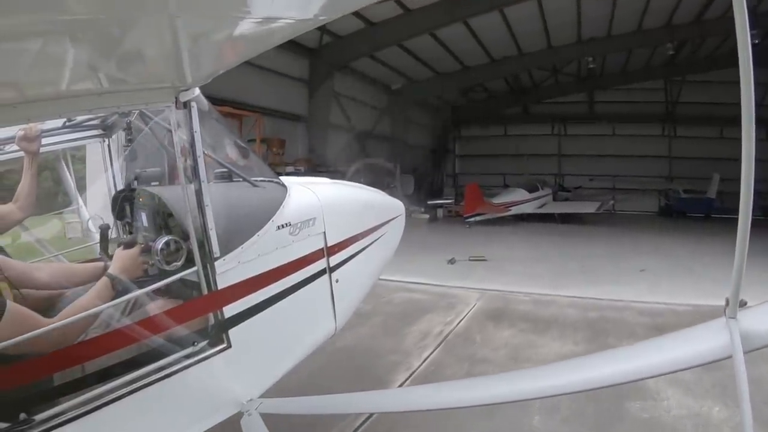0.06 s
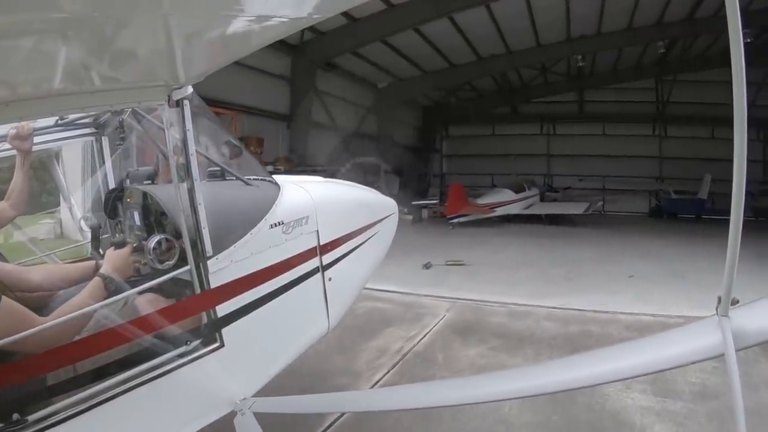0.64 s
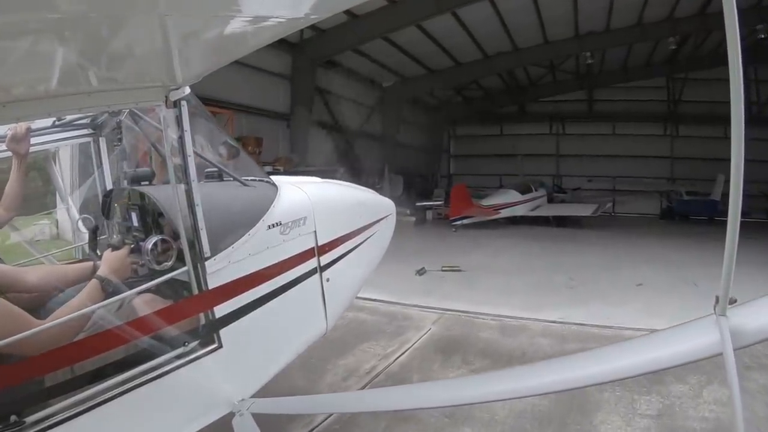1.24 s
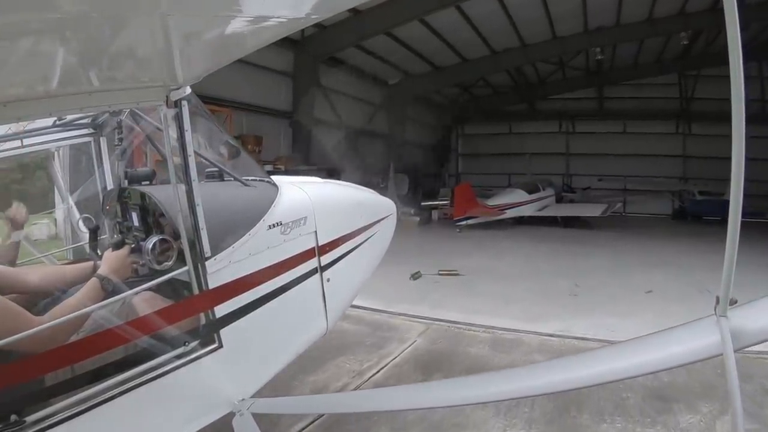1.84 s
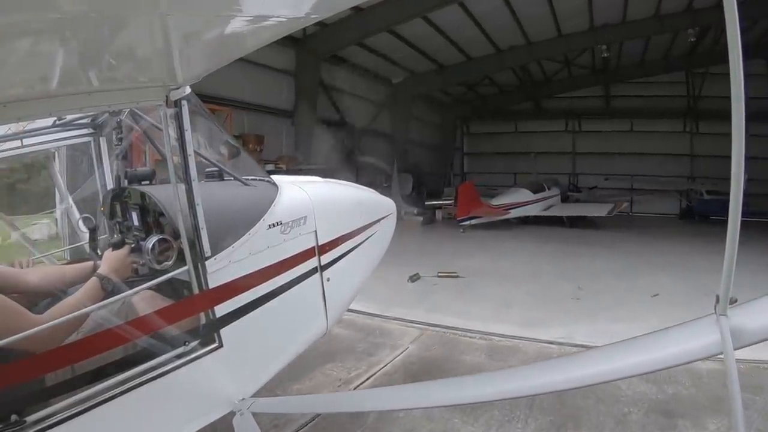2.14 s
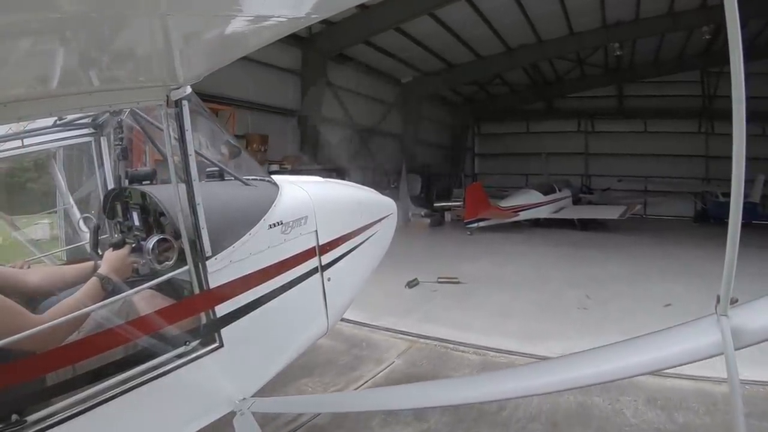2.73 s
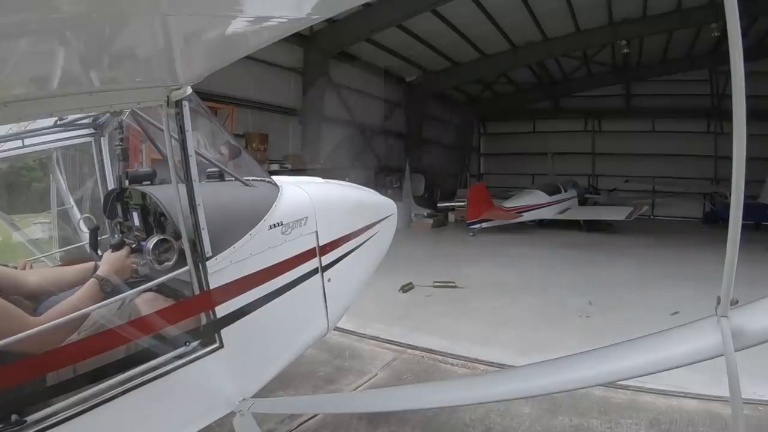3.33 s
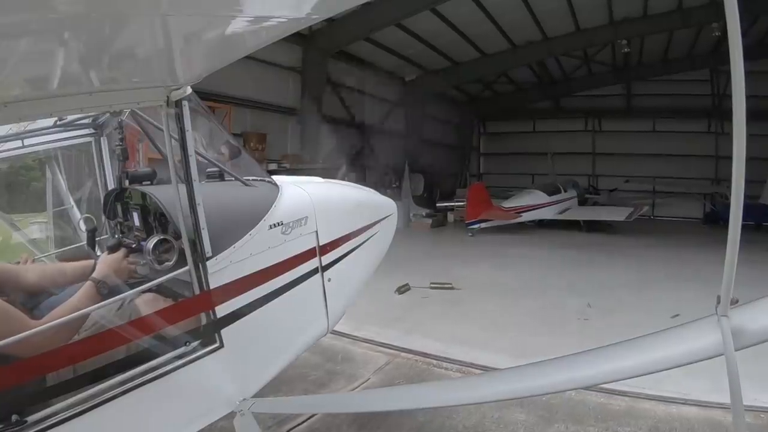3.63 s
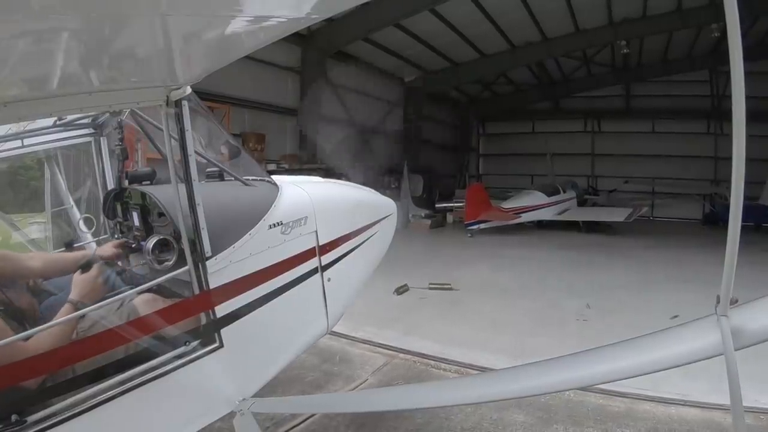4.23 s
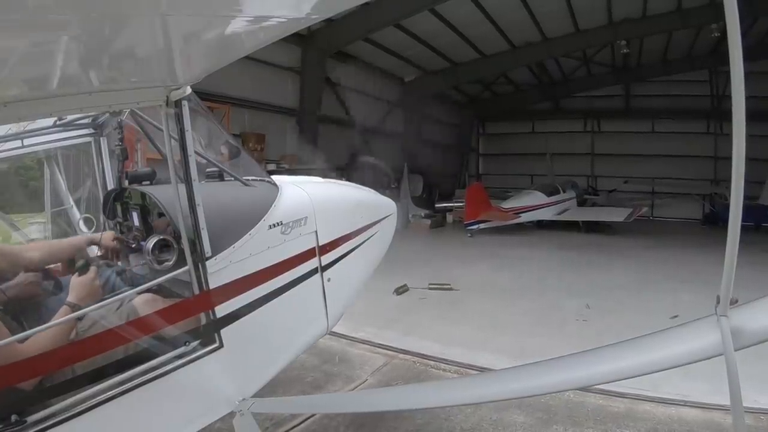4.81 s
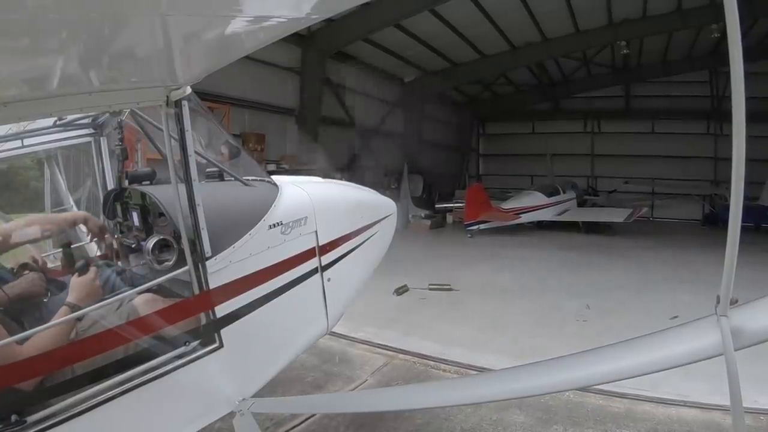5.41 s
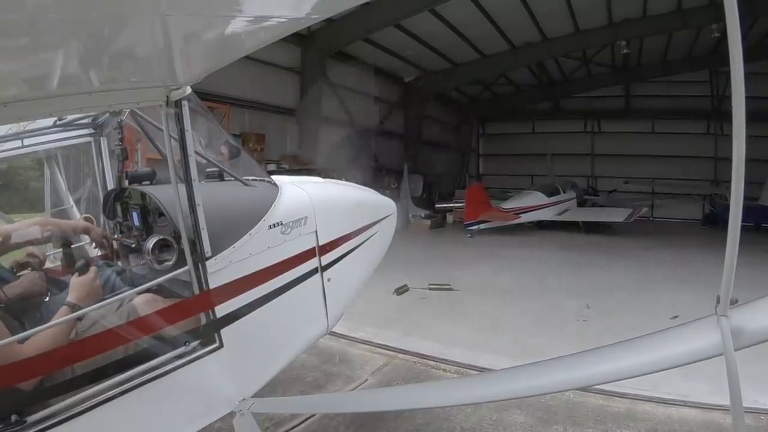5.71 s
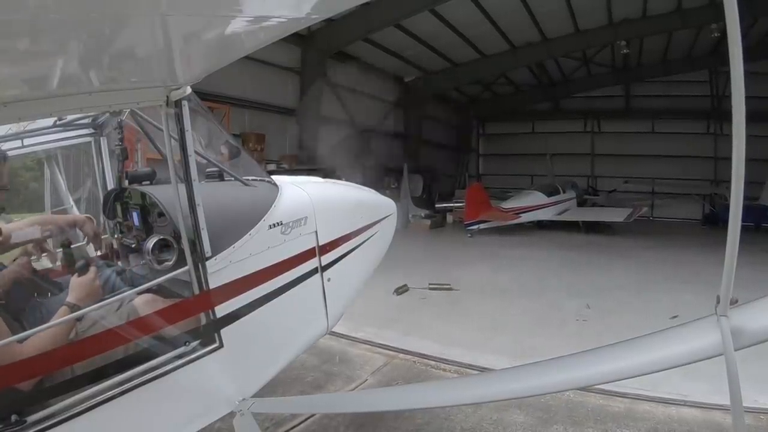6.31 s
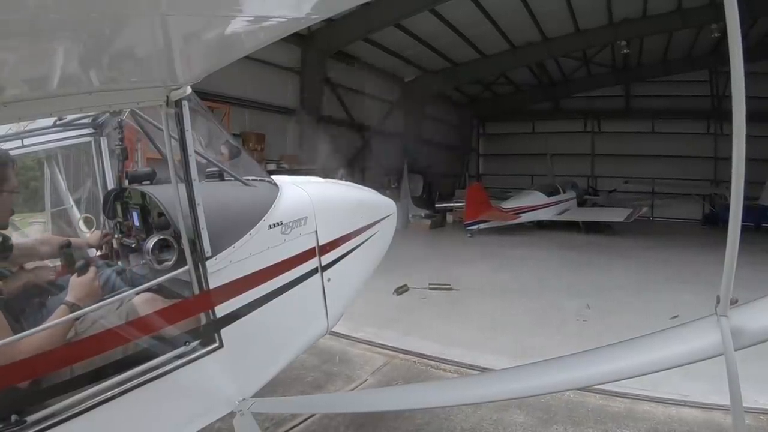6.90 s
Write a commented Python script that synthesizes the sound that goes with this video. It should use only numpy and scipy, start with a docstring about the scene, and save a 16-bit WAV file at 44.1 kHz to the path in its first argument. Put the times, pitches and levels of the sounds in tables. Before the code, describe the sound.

A light aircraft's piston engine runs loudly throughout, heard outdoors in front of a hangar, close beside the engine cover. It starts as a deep, fast-pulsing drone with a barking exhaust, a humming propeller that chops the air, a mechanical hiss and a low buffeting rumble. Irregular exhaust pops dot the first two and a half seconds, and the pitch eases slightly at around 1 second. From about 3 seconds the throttle closes and the engine slows, falling in pitch until just after 4 seconds. At about 3.8 seconds a brake gives one very short, low groan. The engine then settles into a lumpy, chugging idle with light metallic valve ticks. Between about 4.3 and 5 seconds it runs raggedly, with a harder bark and a dense cluster of pops. Another brief rough spell comes near 5.8 seconds, and the idle continues with scattered pops to the end, just after 7 seconds.

```python
"""Outside a hangar, beside the engine cover of a light aircraft that taxis up and stops.
Its four-cylinder engine fires in quick pulses, so the exhaust booms, barks and now and then pops.
The propeller hums and chops the air, and the valves and gears hiss. The throttle closes, a brake
groans as the wheels stop, and the engine drops to a lumpy, ticking idle."""
import sys
import numpy as np
from scipy import signal
from scipy.fft import rfft, irfft
from scipy.io import wavfile
from scipy.ndimage import uniform_filter1d, minimum_filter1d

SR = 44100
rng = np.random.default_rng(int(sys.argv[2]) if len(sys.argv) > 2 else 0)


def unload_wav(signal):
    """Save mono or channel-first audio to the path in sys.argv[1] as 16-bit WAV at rate SR, clipped to [-1, 1]."""
    wavfile.write(
        sys.argv[1],
        SR,
        np.round(np.clip(np.atleast_2d(signal).T, -1, 1) * 32767).astype(np.int16),
    )


N = 315310
TIME = np.arange(N) / SR
BINS = np.fft.rfftfreq(N, 1 / SR)
# In one engine cycle each cylinder fires once. Below, "cycles" is the running count of them.
IDLE_HZ, TAXI_HZ, FAST_HZ = 14.8, 19.3, 20.82  # cycles per second
BLADES_PER_CYCLE = 2.47

# Sound arrives out of step on the two sides. Each row: pitch in Hz, lead of the left in radians.
LEFT_LEAD = [(40, -4.1), (50, -3.9), (62, -2.5), (68, -.3), (77, .1), (93, -.6), (108, .3), (125, .1),
             (140, 1.7), (155, 2.4), (200, 1.3), (290, .6), (600, 1.9), (860, 2.7), (1500, 2.2), (2000, .8),
             (2600, 0), (4300, .3), (7000, 1), (15000, 2)]
# The four unequal cylinders. Each row: strength in dB, lateness at idle as a share of a cycle.
CYLINDERS = [(1, .005), (-1.5, .025), (-1, -.11), (0, .01)]
# The hardest exhaust pops. Each row: time in seconds, strength in dB.
HARD_POPS = [(0.426, -18.5), (0.459, -17), (0.504, -16), (0.59, -13.5), (0.648, -16.5), (0.7, -17),
             (0.796, -16.5), (0.836, -17.5), (1.002, -19), (1.123, -13.5), (1.533, -16), (1.558, -15),
             (1.584, -15.5), (1.626, -13), (1.74, -12.5), (2.124, -20), (2.191, -15), (2.377, -14),
             (2.634, -14), (3.397, -18), (3.632, -20), (3.802, -20), (3.965, -16.5), (4.037, -19),
             (4.11, -15.5), (4.306, -20.5), (4.345, -15.5), (4.372, -16), (4.409, -10.5), (4.436, -19),
             (4.452, -21.5), (4.476, -23.5), (4.541, -18), (4.563, -12), (4.603, -14.5), (4.645, -15.5),
             (4.659, -22), (4.672, -12.5), (4.718, -18.5), (4.737, -14), (4.796, -15.5), (4.821, -20.5),
             (4.864, -13.5), (4.909, -16.5), (4.928, -16), (4.954, -17.5), (4.972, -18.5), (4.994, -18.5),
             (5.25, -18.5), (5.318, -22), (5.493, -16.5), (5.75, -14.5), (5.765, -19), (5.829, -12.5),
             (5.895, -18), (6.02, -21.5), (6.251, -18.5), (6.297, -19), (6.407, -24), (6.469, -17),
             (6.536, -14), (6.553, -24), (6.668, -19.5), (6.736, -18), (7.049, -16.5), (7.114, -12.5)]


def undb(db):
    """Turn decibels into a gain."""
    return 10 ** (np.asarray(db) / 20)


def curves(table, x=TIME):
    """Follow each column of a table smoothly, by time or by another control."""
    points, *columns = np.transpose(table)
    return [np.interp(x, points, c) for c in columns]


def at(points, hz):
    """Read a table of pitches and values at any pitch."""
    pitch, value = np.transpose(points)
    return np.interp(np.log(hz + 1e-3), np.log(pitch), value)


def unit(x):
    """Scale a signal to an average (rms) level of 1."""
    return x / np.sqrt(np.mean(x ** 2))


def ring(x, colour):
    """Give a sound a tone colour, so that a pulse rings after it strikes, never before."""
    beyond = np.maximum(BINS / colour[-1][0], 1)  # fades steeply above the last row
    cepstrum = irfft(np.log(undb(at(colour, BINS)) / beyond ** 2), N)
    cepstrum[1:N // 2] *= 2
    cepstrum[N // 2 + 1:] = 0
    return irfft(rfft(x) * np.exp(rfft(cepstrum)), N)


def mode(pulses, hz, fade_s):
    """Strike one ringing note that falls by 60 dB in fade_s."""
    t = TIME[:SR // 5]
    return signal.oaconvolve(pulses, undb(-60 * t / fade_s) * np.sin(2 * np.pi * hz * t))[:N]


def shelf(x, hz, db):
    """Raise or lower everything above hz by a moving gain."""
    high = irfft(rfft(x) * (1 - 1 / (1 + (BINS / hz) ** 16)), N)
    return x + high * (undb(db) - 1)


def side_phases(hz):
    """Split the left side's lead evenly between left and right."""
    return at(LEFT_LEAD, hz) * np.array([[.5], [-.5]])


def spread(x):
    """Put the left and right sides of a sound out of step."""
    return irfft(rfft(x) * np.exp(1j * side_phases(BINS)), N)


def air(shared):
    """Left and right noise with a share of their power in common."""
    return np.sqrt(shared) * rng.standard_normal(N) + np.sqrt(1 - shared) * rng.standard_normal((2, N))


def wander(hz):
    """A smooth random drift of about 1 either way."""
    hold = int(SR / hz)
    steps = np.repeat(rng.standard_normal(N // hold + 1), hold)[:N]
    return unit(uniform_filter1d(uniform_filter1d(steps, hold), hold))


def strikes(times, sizes):
    """One sharp pulse at each of the times."""
    return np.bincount(np.clip(np.asarray(times) * SR, 0, N - 1).astype(int), sizes, N)


def sputter(pulses, burst_db, decay_s):
    """Follow each pulse with a short, ever new burst of noise, like swirling gas."""
    power = signal.lfilter([1], [1, -np.exp(-2 / (decay_s * SR))], pulses ** 2)
    return pulses + undb(burst_db) * np.std(pulses) * unit(np.sqrt(power) * air(shared=0.27))


def slipstream(db=-40, top_hz=35):
    """Air from the propeller buffets each side on its own with a deep rumble."""
    lowpass = signal.butter(2, top_hz, fs=SR, output="sos")
    return undb(db) * unit(signal.sosfilt(lowpass, air(shared=0)))


def gears(cycles, teeth_per_cycle=175, roughness_hz=135):
    """Meshing teeth whine roughly at their own rate and half of it, rattled by the propeller's load."""
    lowpass = signal.butter(2, roughness_hz, fs=SR, output="sos")

    def whine(multiple):
        rough = signal.sosfilt(lowpass, air(shared=1) + 1j * air(shared=1))
        return unit(np.real(rough * np.exp(2j * np.pi * multiple * cycles)))
    blades = 2 * np.pi * BLADES_PER_CYCLE * cycles
    rattle = np.exp(.3 * np.cos(blades) + .5 * np.cos(2 * blades)) * undb(2 * wander(60))
    return (whine(teeth_per_cycle) + whine(teeth_per_cycle / 2)) * rattle


def hiss(cycles, settled):
    """Valves and blade tips hiss in step with the shafts."""
    # The colour of the hiss. Each row: pitch in Hz, level in dB.
    colour = [(1500, -9.5), (3000, -6.5), (4000, 0.5), (4850, -4.5), (5800, 1), (7500, 4), (8800, -8),
              (10200, -10), (11200, -13.5), (15500, -19.5)]
    valves = 0.089 * np.cos(4 * np.pi * cycles)
    blades = 0.045 * np.cos(2 * np.pi * BLADES_PER_CYCLE * cycles)
    swell = np.exp(valves + blades) * undb(0.54 * wander(22))
    noise = unit(spread(ring(air(shared=.35) * swell, colour)))
    return shelf(noise, hz=11000, db=-9 * settled)


def valve_ticks(cycles, scatter_db=5.5, slack_s=.0012):
    """The valves tick in every cycle; each tick rings the metal covers with its own mix of notes."""
    # The ticks. Each row: place in the cycle from 0 to 1, level in dB.
    ticks = [(.32, -2), (.79, 0), (.91, -.5)]
    # The covers' notes. Each row: pitch in Hz, fade time in seconds, level in dB.
    cover_notes = [(2080, .018, -3), (2600, .022, 0), (3450, .024, 1), (3900, .016, -1)]
    place, tick_db = np.transpose(ticks)
    times = np.interp(np.arange(int(cycles[-1]))[:, None] + place, cycles, TIME)
    times = times + slack_s * rng.standard_normal(times.shape)
    out = 0
    for hz, fade_s, note_db in cover_notes:
        chance = np.clip(rng.standard_normal(times.shape), -2, 1.3)
        sizes = undb(tick_db + note_db + scatter_db * chance)
        rattle = sputter(strikes(times.ravel(), sizes.ravel()), burst_db=-5, decay_s=.005)
        out = out + np.array([mode(side, hz, fade_s) for side in rattle])
    return unit(spread(out))


def brake(start_s=3.797, length_s=0.14, hz=174, sag=0.069):
    """The brake sticks and slips in a short groan; the airframe rings at four times its pitch."""
    progress = np.clip((TIME - start_s) / length_s, 0, 1)
    phase = 2 * np.pi * np.cumsum(hz * (1 - sag * progress ** 2)) / SR
    tone = undb(-21.5) * np.sin(phase) + undb(-36) * np.sin(4 * phase)
    return tone * np.sin(np.pi * progress) * np.array([[.7], [1.2]])


def propeller_wash(cycles, idling, left_db=0.73):
    """Swirling air and exhaust gas, chopped by the blades under power, puffing with the firings at idle."""
    # The colour of the rushing air. Each row: pitch in Hz, level in dB.
    colour = [(400, -10.5), (790, -7), (880, -3), (935, 5), (1030, -2.5), (1150, -1.5), (1280, -7),
              (1560, -9), (1680, -8.5), (1820, -14), (2100, -14), (2850, -18), (3500, -16.5), (4800, -32),
              (9000, -44.5)]
    puffs = 0.27 * np.cos(8 * np.pi * cycles) + 0.059 * np.cos(2 * np.pi * cycles)
    chop = 0.11 * np.cos(2 * np.pi * BLADES_PER_CYCLE * cycles)
    swell = np.exp(idling * puffs + (1 - idling) * chop)
    rush = air(shared=0.64) * swell * undb(0.51 * wander(25))
    return unit(spread(ring(rush, colour))) * undb([[left_db], [-left_db]])


def propeller_hum(cycles, idling, flutter=0.38):
    """The geared propeller hums out of step with the firings; gusts shake its higher tones most."""
    # Each row: multiple of the blade rate, left and right dB when taxiing, left and right dB at idle.
    tones = [(1, -45, -21.5, -42, -42), (2, -40.5, -18, -25.5, -31.5), (3, -51.5, -23, -54.5, -25)]
    out = 0
    for multiple, *db in tones:
        multiple, db = round(multiple), np.array(db)[:, None]
        level = undb(db[:2] * (1 - idling) + db[2:] * idling)
        gusts = unit(np.abs(1 + flutter * multiple * wander(12)))
        phase = multiple * (2 * np.pi * BLADES_PER_CYCLE * cycles + flutter * wander(12))
        out = out + level * gusts * np.cos(phase)
    return spread(out)


def firing_times(cycles, idling):
    """When the cylinders fire, in seconds: evenly under power, limping at idle."""
    even = np.arange(.025, cycles[-1], 1 / 4)
    late = np.resize(np.transpose(CYLINDERS)[1], len(even)) * np.interp(even, cycles, idling)
    return np.interp(even + late, cycles, TIME)


def stutter(times, sizes, idling, jitter=.13, scatter_db=2, under_power_db=-7):
    """Gas leaves in uneven after-bursts behind each pulse: a rasp at idle, weaker under power."""
    # The after-bursts. Each row: usual gap before it in seconds, level against the pulse in dB.
    bursts = [(.0075, -8.5), (.0065, -13), (.007, -12)]
    gap_s, db = np.transpose(bursts)
    chance = rng.standard_normal((len(times), 2, len(gap_s)))
    later = times[:, None] + np.cumsum(gap_s * (1 + jitter * chance[:, 0]), axis=1)
    power = 1 - np.interp(times, TIME, idling)[:, None]
    weaker = sizes[:, None] * undb(db + under_power_db * power + scatter_db * chance[:, 1])
    return strikes(times, sizes) + strikes(later.ravel(), weaker.ravel())


def exhaust_thuds(fired, settled, idle_db=6):
    """No two firings burn alike: their differences make low thumps, louder at idle."""
    # The colour of a thud on each side. Each row: pitch in Hz, level in dB.
    left_colour = [(15, -30), (40, -39.5), (70, 10), (95, -3), (150, -1.5), (200, -25), (400, -54.5)]
    right_colour = [(15, -25.5), (42, -12), (70, 2.5), (100, -2.5), (145, 1), (175, -8), (210, -4),
                    (240, -23.5), (400, -46)]
    pulses = strikes(fired, rng.uniform(-1, 1, len(fired)))
    left, right = sputter(pulses, burst_db=-3, decay_s=.03)
    left = undb(-32) * unit(ring(left, left_colour))
    right = undb(-29) * unit(ring(right, right_colour))
    return spread(np.array([left, right])) * undb(idle_db * settled)


def ragged_running():
    """Extra bark in dB while the engine runs raggedly: each spell rises fast, holds and dies away."""
    # Each row: start in seconds, length in seconds, boost in dB.
    spells = [(0.304, 0.59, 1.5), (4.27, 0.77, 5), (5.744, 0.18, 4), (6.186, .13, 1)]
    extra_db = 0
    for start_s, length_s, db in spells:
        progress = np.clip((TIME - start_s) / length_s, 0, 1)
        extra_db += db * np.sqrt(np.abs(np.sin(np.pi * progress)))
    return extra_db


def exhaust_bark(fired, idling, scatter_db=2, jitter_s=.0004):
    """Each firing cracks out of the pipe and rings the silencer, with a brighter rasp at idle."""
    # The colour of the bark on each side. Each row: pitch in Hz, level in dB.
    left_colour = [(120, -7.5), (220, -7.5), (310, 1), (400, 0), (525, 5), (565, -3), (603, -8), (640, -7),
                   (678, 2), (760, -15.5), (935, -9.5), (1040, -13.5), (1150, -3), (1220, -19), (1290, -23),
                   (3000, -54)]
    right_colour = [(120, -26.5), (220, 3.5), (310, 10), (370, 2), (440, 8.5), (500, 3), (550, -7),
                    (600, -4.5), (690, -9), (780, -11.5), (935, -5), (1040, -14), (1160, -12),
                    (1290, -30.5), (3000, -48.5)]
    chance = rng.standard_normal((len(fired), 2))
    cylinder_db = np.resize(np.transpose(CYLINDERS)[0], len(fired))
    sizes = undb(cylinder_db + scatter_db * np.clip(chance[:, 0], -2, 1))
    # A weak firing leaves the unburnt fuel that feeds a pop.
    wait_s = np.transpose(HARD_POPS)[0] - fired[:, None]
    sizes[((wait_s > -.004) & (wait_s < .025)).any(axis=1)] *= .35
    pulses = stutter(fired + jitter_s * chance[:, 1], sizes, idling)
    left, right = sputter(pulses, burst_db=-7, decay_s=.007)
    bark = spread(np.array([ring(left, left_colour), ring(right, right_colour)]))
    return unit(shelf(bark, hz=550, db=5 * idling))


def exhaust_pops(fired, load_db, settled, stray_odds=0.025, idle_odds=0.45, stray_db=16.5):
    """Unburnt fuel goes off with a knock that rings the silencer: hard at set times, lightly by chance."""
    # The colour of the knock on each side. Each row: pitch in Hz, level in dB.
    left_colour = [(150, -28), (330, -10), (400, -5), (455, 1), (525, 3), (560, 1), (600, 0), (640, -5),
                   (680, -5), (760, -19), (930, -15), (1040, -21), (1160, -13), (1300, -28), (2500, -46)]
    right_colour = [(150, -28), (300, -7), (370, -3), (450, 3.5), (500, 1), (550, -4), (600, -5),
                    (680, -12), (790, -20), (930, -16), (2500, -46)]
    # The silencer's notes. Each row: pitch in Hz, fade time in seconds, left dB, right dB.
    silencer_notes = [(445, .06, -20, -17), (602, .06, -26, -28), (678, .1, -24, -32)]
    pop_s, pop_db = np.transpose(HARD_POPS)
    first_cylinder = np.resize([1, 0, 0, 0], len(fired))  # pops far more often at idle
    odds = stray_odds + idle_odds * first_cylinder * np.interp(fired, TIME, settled)
    clear = np.abs(pop_s - fired[:, None]).min(axis=1) > .02  # no hard pop close by
    strays = clear * (rng.random(len(fired)) < odds) * undb(stray_db + np.interp(fired, TIME, load_db))
    pulses = stutter(pop_s, undb(pop_db), settled) + stutter(fired, strays, settled)
    knock_peak = np.abs(ring(strikes([0], [1]), right_colour)).max()
    left, right = sputter(pulses / knock_peak, burst_db=-16, decay_s=.01)
    knock = np.array([ring(left, left_colour), ring(right, right_colour)])
    ringing = sum(undb(db)[:, None] * mode(pulses, hz, fade_s) for hz, fade_s, *db in silencer_notes)
    return spread(knock + ringing)


def standing_waves(hz):
    """How many dB a tone gains or loses on each side as its pitch slides through standing waves."""
    # Each row: pitch in Hz, half width in Hz, left dB, right dB.
    waves = [(65.8, 0.65, 10, 11.5), (67.7, 3.4, 1, 2.5), (74.57, 2.16, 8, 4), (98.3, 0.82, -1, -15),
             (128.9, 0.76, -11.5, 11), (138.9, 4.4, -16, 7.5), (151.8, 1.6, -5, -7.5)]
    grid_hz = np.arange(50, 200, .1)
    change_db = sum(np.array([[left_db], [right_db]]) * np.exp(-((grid_hz - centre) / width) ** 2)
                    for centre, width, left_db, right_db in waves)
    return np.array([np.interp(hz, grid_hz, side) for side in change_db])


def exhaust_boom(cycles, cycle_hz, settled):
    """The firings blend into a deep note and its octave; unequal cylinders add tones that chug at idle."""
    # Each row: cycle rate in Hz, left and right dB of the firing note, left and right dB of its octave.
    boom_levels = [(16.4, -26, -17.5, -21, -20), (19.5, -13.5, -15, -21.5, -15),
                   (20.46, -21.5, -11, -35, -26.5)]
    # The added tones at three speeds. Each row: multiple of the cycle rate, left dB, right dB.
    idle_tones = [(2, -30.5, -35), (3, -17.5, -25.5), (5, -37.5, -29.5), (6, -30.5, -11.5), (7, -36.5, -27),
                  (9, -24.5, -24), (10, -31.5, -23.5), (12, -53, -32.5), (13, -46, -35), (25, -44.5, -36.5)]
    taxi_tones = [(2, -23, -18.5), (3, -22.5, -36.5), (5, -48, -35), (6, -41, -31), (7, -53.5, -34.5),
                  (9, -41.5, -40.5), (10, -54, -37.5), (11, -54.5, -34.5), (16, -42.5, -39),
                  (21, -41.5, -36.5)]
    fast_tones = [(2, -24, -20.5), (3, -29, -23), (5, -46, -39), (6, -30, -27.5), (7, -49, -25),
                  (10, -63, -30)]

    def tone(multiple, db):
        hz = multiple * cycle_hz
        unsteady = 1 + (.035 + .095 * settled) * (wander(22) + 1j * wander(22))
        stagger = .57 * multiple ** 2  # keeps the tones from all peaking together
        phase = 2 * np.pi * multiple * (cycles - .5) + stagger + side_phases(hz)
        return undb(db + standing_waves(hz)) * np.real(unsteady * np.exp(1j * phase))
    boom_db = np.array(curves(boom_levels, cycle_hz))
    out = tone(4, boom_db[:2]) + tone(8, boom_db[2:])
    for tones, weights in zip((idle_tones, taxi_tones, fast_tones), np.eye(3)):
        share = np.interp(cycle_hz, (IDLE_HZ, TAXI_HZ, FAST_HZ), weights)
        for multiple, left_db, right_db in tones:
            out += share * tone(round(multiple), np.array([[left_db], [right_db]]))
    return out


def scene():
    """The engine's speed times the exhaust, machinery and propeller; its load drives the midrange."""
    # The engine's speed. Each row: time in seconds, cycles per second.
    speed = [(0, 20.9), (0.5, 20.86), (1.05, 19.67), (1.5, 19.38), (2.2, 19.25), (2.9, 19.2), (3.2, 18.55),
             (3.6, 16.77), (3.9, 16.03), (4.25, 15.53), (5.2, 15.49), (6.2, 15.57), (7.15, 15.59)]
    # The engine's load. Each row: time in seconds, base midrange level in dB, base treble level in dB.
    load = [(0.15, -44, -54), (0.87, -44.5, -56), (1.76, -41.5, -53.5), (2.92, -40.5, -52.5),
            (3.43, -45, -58.5), (4.3, -43, -56), (4.53, -42.5, -57), (7.05, -41.5, -53.5)]
    cycle_hz, = curves(speed)
    load_db, treble_db = curves(load)
    cycles = np.cumsum(cycle_hz) / SR
    idling = np.interp(cycle_hz, (IDLE_HZ, TAXI_HZ), [1, 0])  # grows as the engine slows
    settled = np.interp(cycle_hz, (15.55, 16.2), [1, 0])  # nears 1 only once the idle has settled
    fired = firing_times(cycles, idling)
    # At idle the low end dips once a cycle, and no cycle is as strong as the next.
    dip_db = -4.5 * np.exp(-((cycles % 1 - .35) / .085) ** 2)
    lumps = undb(settled * (dip_db + 1.2 * wander(30)))
    low_end = lumps * (exhaust_boom(cycles, cycle_hz, settled) + exhaust_thuds(fired, settled))
    bark = undb(load_db + 11 + 0.5 * idling + ragged_running()) * exhaust_bark(fired, idling)
    exhaust = low_end + bark + exhaust_pops(fired, load_db, settled)
    machinery = undb(treble_db + 3.5) * hiss(cycles, settled)
    machinery += undb(treble_db + 2) * settled * valve_ticks(cycles)
    machinery += undb(load_db - 13 - 9.5 * idling) * gears(cycles)  # the gears go slack at idle
    propeller = undb(load_db + 6) * propeller_wash(cycles, idling) + propeller_hum(cycles, idling)
    return slipstream() + machinery + brake() + propeller + exhaust


def record(dry, fade_s=.004, ceiling=.59, smooth_samples=600, top_hz=15600):
    """Fade both ends, drop the deepest rumble, ease down the loudest peaks and cut the very top."""
    fade = np.minimum(np.minimum(TIME, TIME[::-1]) / fade_s, 1)
    x = signal.sosfilt(signal.butter(1, 12, "high", fs=SR, output="sos"), dry * fade)
    gain = ceiling / np.maximum(np.abs(x).max(axis=0), ceiling)
    x = x * uniform_filter1d(minimum_filter1d(gain, smooth_samples), smooth_samples)
    return signal.sosfilt(signal.ellip(8, .2, 70, top_hz, fs=SR, output="sos"), x)


dry = scene()
out = record(dry)
unload_wav(out)
```